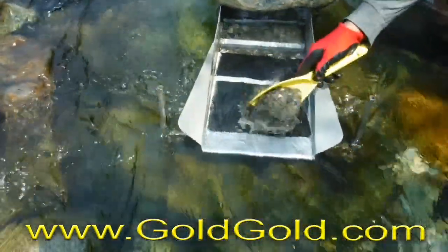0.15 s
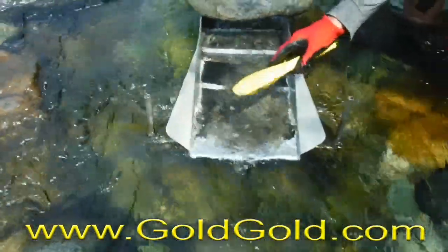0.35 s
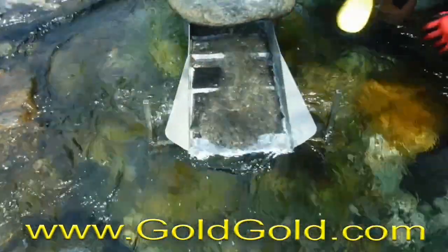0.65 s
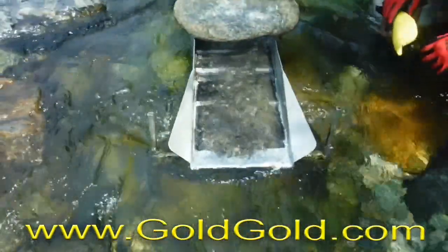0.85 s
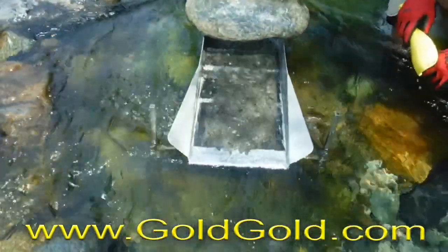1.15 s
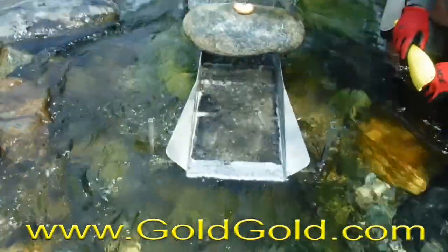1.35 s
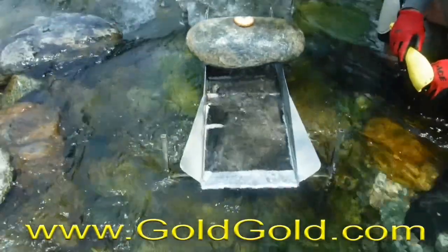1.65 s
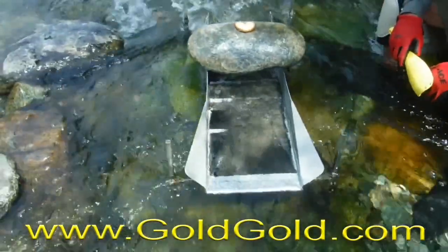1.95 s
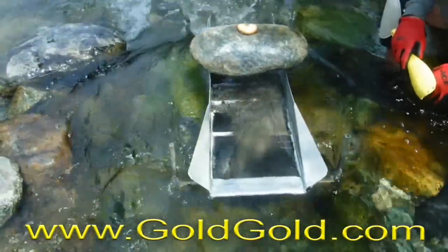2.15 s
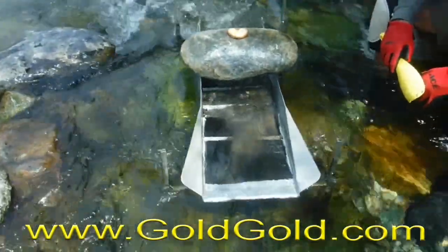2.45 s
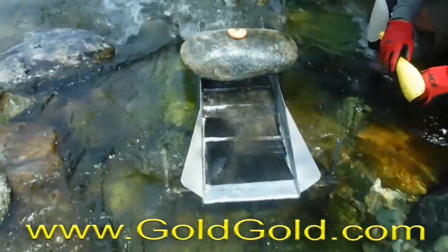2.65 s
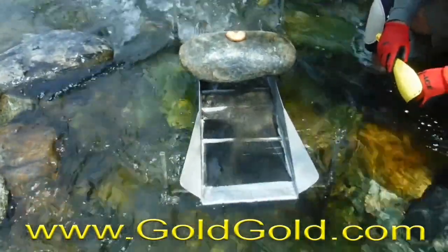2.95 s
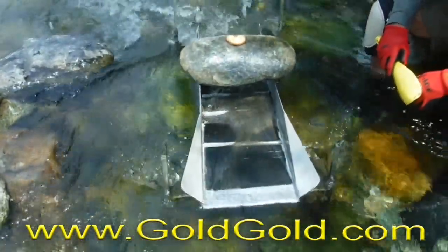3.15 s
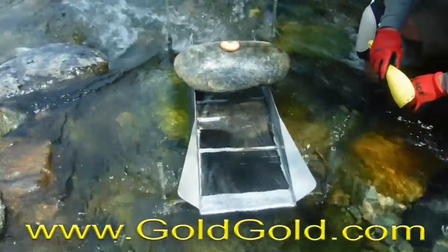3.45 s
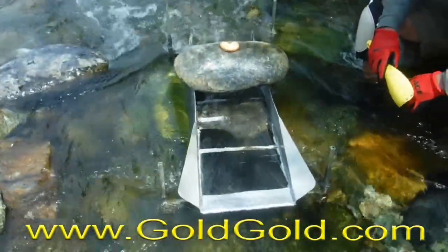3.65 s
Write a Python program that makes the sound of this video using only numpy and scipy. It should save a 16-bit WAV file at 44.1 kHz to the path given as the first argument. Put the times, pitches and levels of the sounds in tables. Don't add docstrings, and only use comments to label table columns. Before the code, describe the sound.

Rushing creek water, bright and bubbly, flows over stones and through a metal sluice box throughout; a scoop knock with stony clatter comes early, a lower double knock late, close to a small microphone.

```python
import sys
import numpy as np
from scipy import signal
from scipy.fft import rfft, irfft
from scipy.io import wavfile
from scipy.ndimage import uniform_filter1d

SR = 44100
rng = np.random.default_rng(int(sys.argv[2]) if len(sys.argv) > 2 else 0)


def gain_from_db(level_db):
    decades = np.asarray(level_db, float) / 20
    return 10 ** decades


def file_out(sig):
    cols = np.atleast_2d(sig).T
    lim = np.clip(cols, -1, 1)
    pcm = np.round(lim * 32767).astype(np.int16)
    wavfile.write(sys.argv[1], SR, pcm)


N = 167580


def evened(x):
    return x / np.sqrt(np.mean(x ** 2) + 1e-20)


def read(points, hz):
    f, value = np.transpose(points)
    return np.interp(np.log(hz + 1), np.log(f + 1), value)


def add(mix, s, sound):
    part = mix[round(s * SR):][:len(sound)]
    part += sound[:len(part)]


def colour(x, *tables):
    hz = np.fft.rfftfreq(len(x), 1 / SR)
    gain_db = sum(read(table, hz) for table in tables)
    return irfft(rfft(x) * gain_from_db(gain_db), len(x))


def wander(lo_hz, hi_hz):
    t = np.arange(0, N + 64, 64) / SR
    sway = sum(np.sin(2 * np.pi * (f * t + rng.random())) / f ** 0.15
               for f in np.geomspace(lo_hz, hi_hz, 30))
    return np.interp(np.arange(N) / SR, t, evened(sway))


def bubble(hz, cycles, glide=0.085):
    u = np.arange(int(2.7 * cycles / hz * SR) + 4) / SR * hz / cycles
    swell = u * np.exp(1 - 4.42 * u) * 3.85
    return swell * np.sin(2 * np.pi * cycles * (u + glide * u ** 2))


def bubbles(table, gain_db, cycles, glide=0.085):
    out = np.zeros(N)
    for s, db, hz in table:
        add(out, s, gain_from_db(db + gain_db) * bubble(hz, cycles, glide))
    return out


def grains(per_s, spread_db, lo_hz, hi_hz, cycles, tilt, clump):
    loudness = gain_from_db(spread_db * np.minimum(rng.exponential(1, N), 4.2))
    size = loudness * (rng.random(N) < per_s * clump / SR)
    kind = rng.integers(0, 32, N)
    out = np.zeros(N)
    for k, hz in enumerate(np.geomspace(lo_hz, hi_hz, 32)):
        g = bubble(hz, cycles * rng.uniform(0.62, 1.64))
        g = g / np.linalg.norm(g) * hz ** tilt
        out += signal.oaconvolve(size * (kind == k), g)[:N]
    return out


def wash():
    patch_db = 1.56
    real, imag, patch = rng.standard_normal((N // 128 + 6, 257, 3)).T
    patch = uniform_filter1d(patch, size=6, axis=0)
    patch = evened(uniform_filter1d(patch, size=14, axis=1))
    cells = (real + 1j * imag) * gain_from_db(patch_db * patch)
    return evened(signal.istft(cells, nperseg=512, noverlap=384)[1][:N])


def spray(shared):
    clump = gain_from_db(5.2 * wander(11, 95) + 4.5 * shared)
    return evened(grains(2400, 2.3, 4600, 14900, 1.32, 0.74, clump / clump.mean()))


# [f/Hz, level/dB]
WATER_COLOUR = [(20, -25), (54, -16.5), (114, -23), (186, -11.5), (273, -6.5), (367, -5), (954, -2),
                (3200, -6)]
# [f/Hz, level/dB]
MIC_COLOUR = [(2900, 8), (3600, 10.5), (4500, 12.5), (5400, 9), (7100, 2), (9100, -9), (11100, -10.5),
              (15500, -29)]
# [t/s, level/dB, extra low gurgle level/dB]
FLOW_LEVEL = [
    (0.0, -23, 0.5),
    (0.46, -24.5, 2),
    (0.72, -24.5, 3.5),
    (2.05, -24, -0.5),
    (2.42, -26, 3),
    (2.75, -23.5, -4),
    (3.8, -25, 3),
]
# [t/s, length/s, level/dB]
SURGES = [
    (0.21, 0.039, 3.5),
    (0.25, 0.068, 2.5),
    (1.05, 0.0085, 4.5),
    (2.115, 0.047, 1),
    (1.098, .016, 2.5),
    (2.292, 0.019, 3),
    (3.37, 0.078, 1.5),
    (2.449, 0.046, 3),
]


def creek():
    wash_db, fizz_db, gurgle_db, spray_db = -4.5, -5, -12.5, -13.5
    swell_db, flicker_db = 0.55, -0.23
    t = np.arange(N) / SR
    s, flow_db, low_db = np.transpose(FLOW_LEVEL)
    shared = wander(4.5, 65)
    clump = gain_from_db(3.6 * shared)
    surge_db = sum(db * np.sin(np.pi * np.clip((t - start) / length, 0, 1)) ** .5
                   for start, length, db in SURGES)

    fizz = evened(grains(4000, 2.93, 1515, 13870, 8.8, 0.69, clump / clump.mean()))
    gurgle = grains(500, 1.85, 147.8, 2380, 6.25, 0.088, 0.94)
    gurgle = evened(colour(gurgle, WATER_COLOUR, MIC_COLOUR))
    far = colour(wash(), [(6000, 0), (10000, 2.0), (15000, 0)])
    flicker = flicker_db * (0.89 * shared + wander(4.9, 65))

    high = gain_from_db(wash_db + 0.24 * surge_db + flicker) * far
    high += gain_from_db(fizz_db + 1.78 * surge_db) * fizz
    high += gain_from_db(spray_db + 3.8 * surge_db) * spray(shared)
    mix = evened(colour(high, WATER_COLOUR, MIC_COLOUR))
    mix += gain_from_db(gurgle_db + np.interp(t, s, low_db)) * gurgle
    return mix * gain_from_db(np.interp(t, s, flow_db) + swell_db * wander(0.56, 3.96))


# [t/s, level/dB, f/Hz]
PLINK_TIMES = [(0.122, -15, 3420), (0.2248, -15, 2200), (0.3819, -18, 2650), (0.832, -15, 2520),
               (0.9817, -18, 2100), (1.4195, -14, 3600), (1.8651, -14.5, 1940), (2.4572, -21, 3540),
               (2.613, -17, 3240), (2.6566, -11.5, 2670), (3.4028, -13, 2540), (3.482, -10, 3430),
               (3.5028, -10, 3080), (3.688, -25, 2900)]


def plinks():
    return bubbles(PLINK_TIMES, gain_db=-1.5, cycles=5.9)


# [t/s, level/dB, f/Hz]
GLUG_TIMES = [(0.211, -27, 500), (0.265, -29, 425), (0.318, -25, 530), (0.587, -32, 549), (0.631, -29, 460),
              (1.139, -30, 404), (1.191, -33, 520), (1.682, -28, 663), (2.359, -25, 552), (2.599, -34, 571),
              (2.656, -26, 611), (3.039, -25, 670), (3.626, -32, 552), (3.729, -31, 600)]


def glugs():
    return bubbles(GLUG_TIMES, gain_db=3.5, cycles=4.7)


# [t/s, level/dB, f/Hz]
POP_TIMES = [(0.2216, -10, 4310), (0.415, -7.5, 4480), (0.443, -8, 2860), (0.613, -19, 4520),
             (0.992, -8.5, 4470), (1.2546, -9, 4620), (1.281, -12, 4710), (1.5834, -5.5, 4300),
             (1.8606, -12, 4780), (2.0981, -12, 4870), (2.122, -13, 4730), (2.2114, -8, 4440),
             (2.288, -9, 4300), (2.583, -7, 4600), (2.616, -12, 4400), (2.69, -9, 4500), (2.7445, -8, 4030),
             (2.8903, -12.5, 3780), (3.0546, -13, 4400), (3.1456, -10, 4400), (3.1608, -2.5, 4200),
             (3.455, -13, 4000), (3.483, -5.5, 4200), (3.509, -20, 4170), (3.5945, -10, 3940),
             (3.699, -2, 5300), (3.757, -11, 4100)]


def pops():
    return bubbles(POP_TIMES, gain_db=-2, cycles=8.5, glide=0.032)


# [t/s, level/dB]
SPLAT_TIMES = [(0.298, -27), (0.4412, -26.5), (0.5294, -25), (0.752, -24), (0.8826, -22.5), (0.991, -26),
               (1.0226, -30), (1.2524, -28), (1.397, -26), (1.652, -24), (1.682, -23.5), (1.7524, -32.5),
               (1.8725, -22.5), (1.9959, -26.5), (2.124, -23), (2.192, -27), (2.474, -23), (2.6963, -27),
               (3.051, -25), (3.1278, -25), (3.1802, -36), (3.283, -27), (3.45, -26), (3.479, -24.5),
               (3.6776, -31)]


def splats():
    out = np.zeros(N)
    t = np.arange(3000) / SR
    for s, db in SPLAT_TIMES:
        fade = gain_from_db(db + 7.0 - 60 * t / 0.015) * (1 - np.exp(-t / 0.0014))
        add(out, s, fade * rng.standard_normal(len(t)))
    return colour(out, MIC_COLOUR, [(3000, -34), (6000, -2), (9500, 13.5), (15000, 0.5)])


# [t/s, level/dB, end f/Hz, t60/s]
PUSHES = [
    (0.442, -33, 33.5, 0.077),
    (3.1622, -17.5, 35, 0.068),
    (3.4547, -25.5, 38, 0.096),
    (3.475, -42, 28, .08),
    (3.502, -36, 42, .06),
]


def thumps():
    sag, sag_s = 4.2, .0075
    out = np.zeros(N)
    t = np.arange(9000) / SR
    for s, db, hz, t60 in PUSHES:
        turns = hz * (t + sag * sag_s * (1 - np.exp(-t / sag_s)))
        fade = gain_from_db(db - 60 * t / t60) * (1 - np.exp(-t / 0.0034))
        add(out, s, fade * np.sin(2 * np.pi * turns))
    return out


# [t/s, level/dB, f/Hz,
# t60/s]
STRIKES = [(.4424, -1, 1410, 0.02), (.5298, 0, 2320, 0.0082), (.5300, -15, 660, 0.027),
           (.5672, -7, 2370, 0.0064), (.9690, -25, 215, 0.066), (.9695, -3.5, 800, 0.0046),
           (1.1352, -3, 1910, 0.0043), (1.1436, 11, 1500, 0.0019), (2.9831, 0.5, 1450, 0.005),
           (3.1606, 7, 1235, 0.011), (3.1725, -6, 704, 0.026), (3.1815, -7, 2310, .016),
           (3.1819, -10, 1190, 0.015), (3.185, -6.5, 1150, 0.029), (3.2250, -14.5, 1090, 0.027),
           (.4490, -8, 610, 0.046), (.4575, -12, 730, 0.027), (.4650, -16, 2620, .015),
           (.4668, -7.5, 1620, .018), (.4760, -15, 1980, .015), (.4908, -12, 2340, .015),
           (.4980, -17, 2390, 0.011), (.5095, -14, 405, 0.017), (.5440, -14, 606, 0.03),
           (.5475, -19, 2330, .015), (.5530, -20, 1350, .02), (.5610, -16, 1200, 0.017),
           (3.1620, -1.5, 500, 0.021), (3.1960, -15, 426, 0.033), (3.1965, -11, 1260, .02),
           (3.2095, -18, 1400, .025), (3.2150, -19, 520, 0.027), (3.2335, -20, 960, .03),
           (3.2440, -21, 800, .03), (3.2530, -28, 620, 0.023), (3.4048, -12, 630, 0.01),
           (.4430, -10, 398, 0.048), (.5310, -22, 210, 0.061), (3.1815, -8, 330, 0.054),
           (.5850, -23, 560, 0.094), (1.1400, -25, 180, 0.045), (3.4050, -28, 320, 0.034)]


def clacks():
    out = np.zeros(N)
    t = np.arange(9000) / SR
    for s, db, hz, t60 in STRIKES:
        fade = gain_from_db(db - 60 * t / t60) * (1 - np.exp(-t / 0.00051))
        add(out, s, -fade * np.sin(2 * np.pi * hz * t))
    return colour(out, [(60, -26), (130, -12), (220, 0), (6000, 0), (12000, -15)])


# [t/s, level/dB]
SNAP_TIMES = [(0.4424, -8), (3.1812, -27), (3.2385, -28), (.8812, -22), (.9930, -17), (.9975, -20),
              (1.0248, -27), (1.0660, -27), (1.6543, -23), (1.6977, -24), (2.4595, -29), (2.4740, -25),
              (3.0533, -23), (3.1420, -29), (3.2817, -28)]
# [f/Hz, level/dB]
SNAP_COLOUR = [(3000, -24), (5000, -11), (8000, -9), (11500, -8), (15500, -15)]


def snaps():
    t60_s = 0.011
    out = np.zeros(N)
    t = np.arange(1200) / SR
    for s, db in SNAP_TIMES:
        add(out, s, gain_from_db(db - 60 * t / t60_s) * rng.standard_normal(len(t)))
    return colour(out, SNAP_COLOUR)


def knocks(modes, hits, rattle_hz, tick_db):
    gravel_share, rattle_t60_s = .15, 0.2
    out = np.zeros(N)
    t = np.arange(9000) / SR
    band = signal.butter(3, rattle_hz, "band", fs=SR, output="sos")
    for s, db, tilt_db, ring, rattle_db in hits:
        z, u = rng.random((2, len(t)))
        body = np.zeros(len(t))
        for k, (hz, mode_db, t60) in enumerate(modes):
            fade = gain_from_db(mode_db + tilt_db * np.log2(hz / 1000) - 60 * t / (t60 * ring))
            body += fade * np.sin(2 * np.pi * hz * t) * (-1) ** k / 2
        pebbles = np.log(u + 1e-9) * np.sign(z - .5) * (abs(2 * z - 1) < gravel_share)
        rattle = evened(signal.sosfilt(band, pebbles))
        rattle *= gain_from_db(rattle_db - 60 * t / (rattle_t60_s * ring)) * (1 - np.exp(-t / 0.0018))
        tick = gain_from_db(tick_db + 6 + 0.5 * tilt_db - 60 * t / 0.015) * np.diff(u, prepend=.5)
        add(out, s, gain_from_db(db) * (body + rattle + tick))
    return colour(out, [(110, -24), (280, 1.5), (5000, 0.5), (9000, -14), (15000, -32)])


# [f/Hz, level/dB, t60/s]
SCOOP_MODES = [(380, -25, 0.18), (656, -13, 0.062), (1000, -14, 0.099), (1225, -8, 0.11),
               (1400, 15.5, 0.0095), (1600, -7.5, 0.032), (2380, 4, 0.013), (3120, -7, 0.043),
               (3700, -22, .03)]
# [t/s, level/dB, tilt/dB per octave, ring share of t60, rattle level/dB]
SCOOP_BLOWS = [
    (0.4425, -2.5, -1.3, 0.98, -12),
    (0.465, -25.5, 7, 0.83, 3),
    (0.4983, -20, 5, 0.32, -29),
    (.5300, -17.5, -8, 1.14, -2),
    (0.5682, -19, 3, 0.28, -3),
    (1.084, -27, -4, 0.86, 4),
]


def scoop():
    return knocks(SCOOP_MODES, SCOOP_BLOWS, rattle_hz=(330, 3100), tick_db=1.5)


# [t/s, level/dB, f/Hz, cycles]
BLOOP_TIMES = [(1.001, -20, 1000, 7.6), (1.087, -22, 494, 3.7), (1.238, -24, 880, 14),
               (1.328, -17, 890, 10.5), (1.761, -20, 916, 8), (2.03, -29.5, 274, 11),
               (2.112, -18.5, 2170, 25), (2.176, -10, 1750, 2), (2.915, -19, 760, 6.6),
               (2.305, -14.5, 5800, 26), (3.404, -19, 500, 3.1)]


def bloops():
    out = np.zeros(N)
    for s, db, hz, cycles in BLOOP_TIMES:
        add(out, s, gain_from_db(db) * bubble(hz, cycles))
    return out


# [f/Hz, level/dB, t60/s]
BOX_MODES = [(302, -4, 0.1), (470, 1.5, 0.031), (724, -12, .12), (840, 4, 0.044), (994, -5, 0.089),
             (1300, -2, .12), (1520, -7, 0.072), (1750, -27, .05)]
# [t/s, level/dB, tilt/dB per octave, ring share of t60, rattle level/dB]
BOX_BLOWS = [
    (3.1604, -5.5, 0.28, 0.54, -6),
    (3.1815, -4, -0.67, 0.82, -13.5),
    (3.2085, -22, 1.1, 0.84, -3),
]


def box():
    return knocks(BOX_MODES, BOX_BLOWS, rattle_hz=(260, 2300), tick_db=-16)


def scene():
    water = creek() + plinks() + glugs() + pops() + splats() + snaps() + bloops()
    blows = thumps() + clacks() + scoop() + box()
    return (water + blows)[None]


def overload(x):
    knee, ceiling = .6, .97
    room = ceiling - knee
    over = np.maximum(abs(x) - knee, 0)
    return np.sign(x) * (np.minimum(abs(x), knee) + room * np.tanh(over / room))


def top_cut(x):
    return signal.sosfilt(signal.butter(12, 16520, fs=SR, output="sos"), x)


def record(dry):
    edge_hz = 15800
    edge = signal.firwin(1023, edge_hz, window=("kaiser", 9), fs=SR)[None]
    mix = signal.oaconvolve(overload(dry), edge, "same")
    return top_cut(mix)


dry = scene()
out = record(dry)
file_out(out)
```